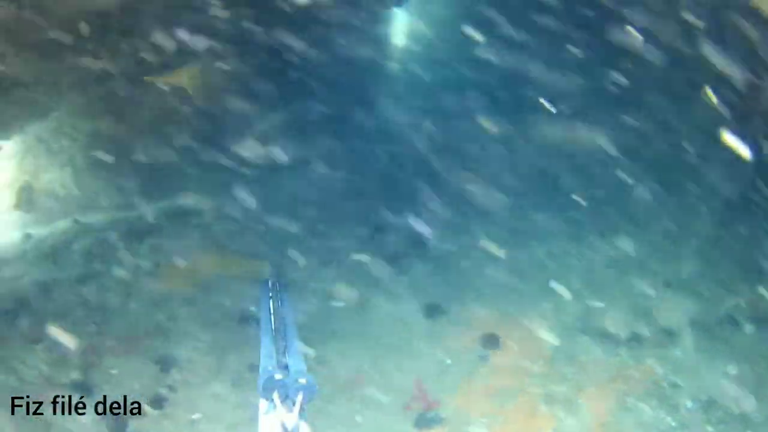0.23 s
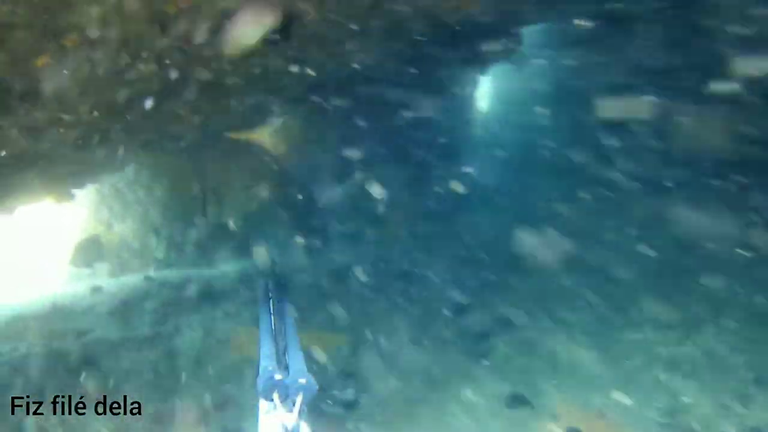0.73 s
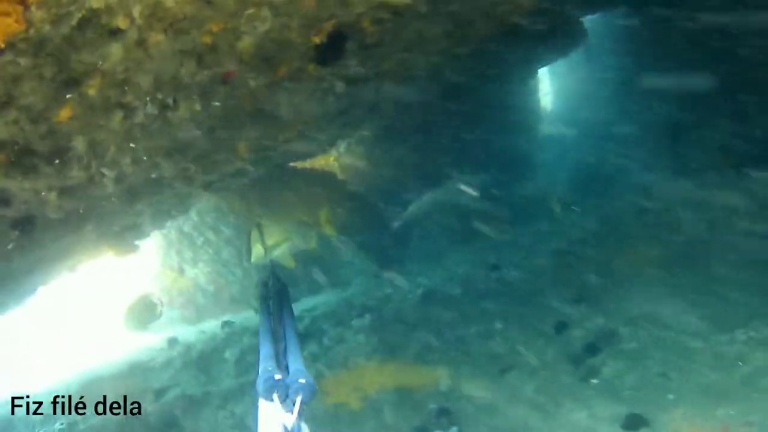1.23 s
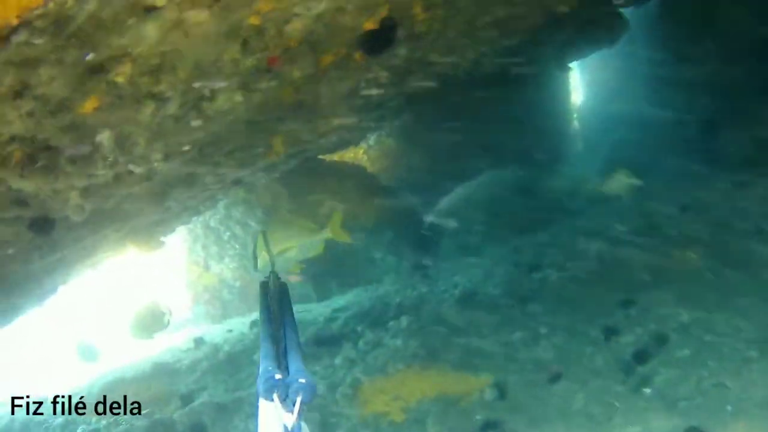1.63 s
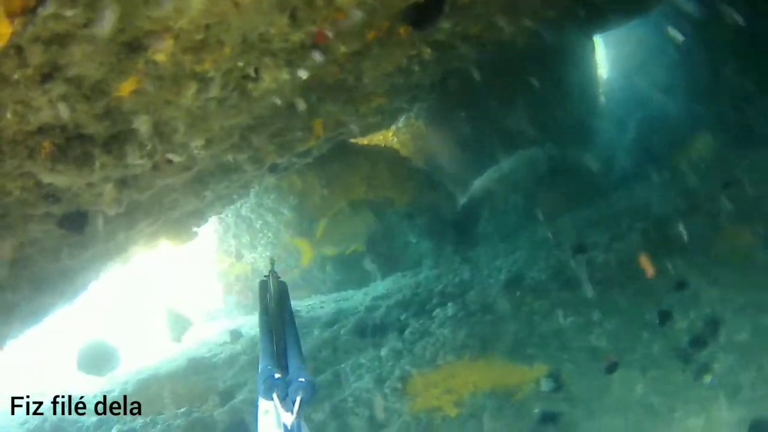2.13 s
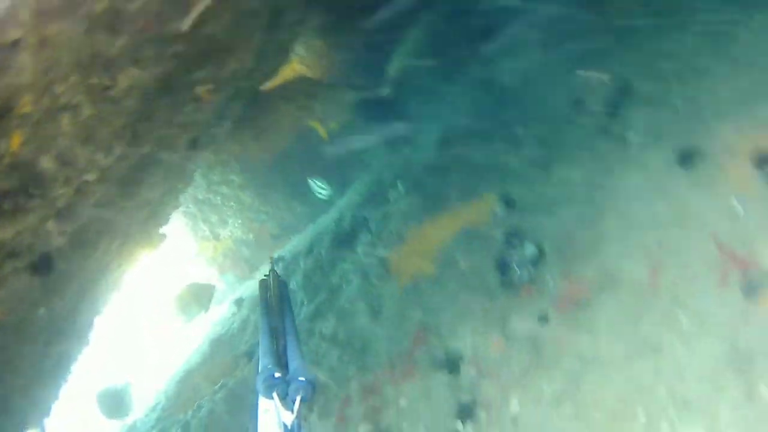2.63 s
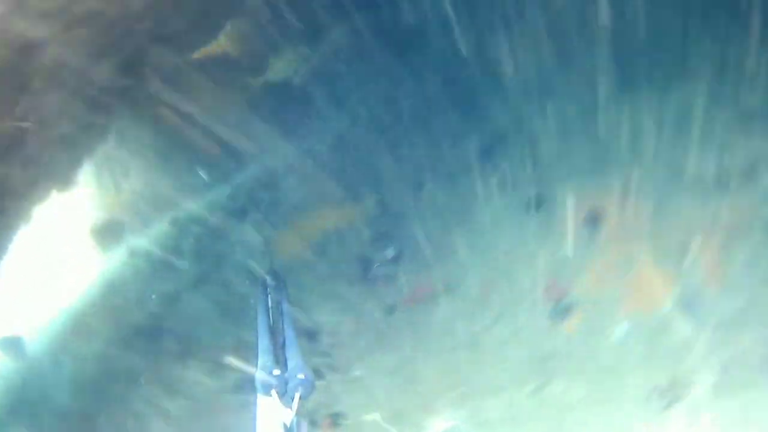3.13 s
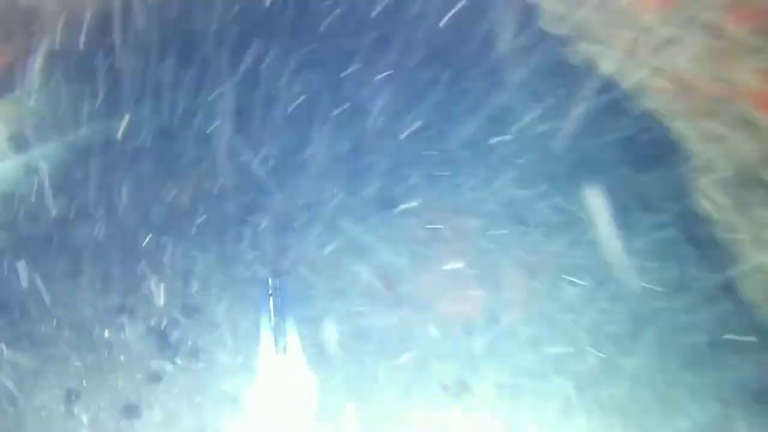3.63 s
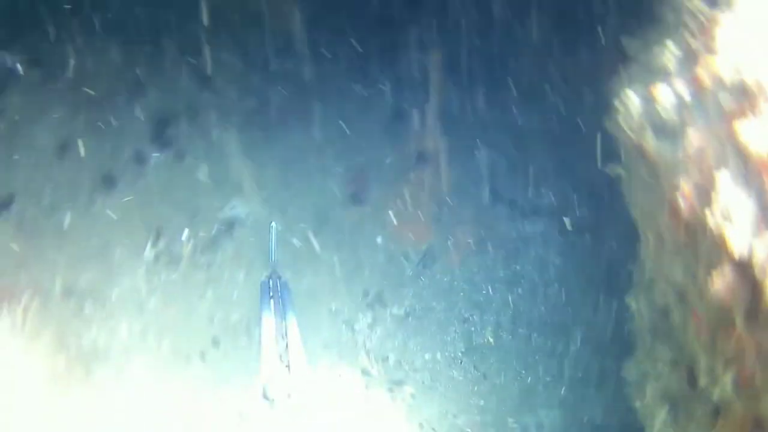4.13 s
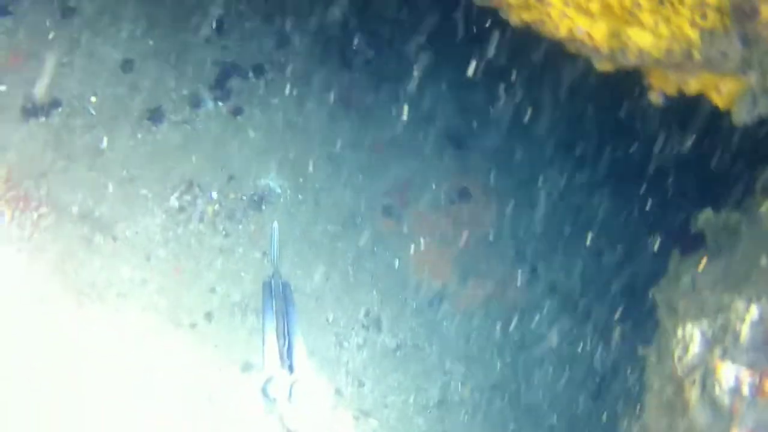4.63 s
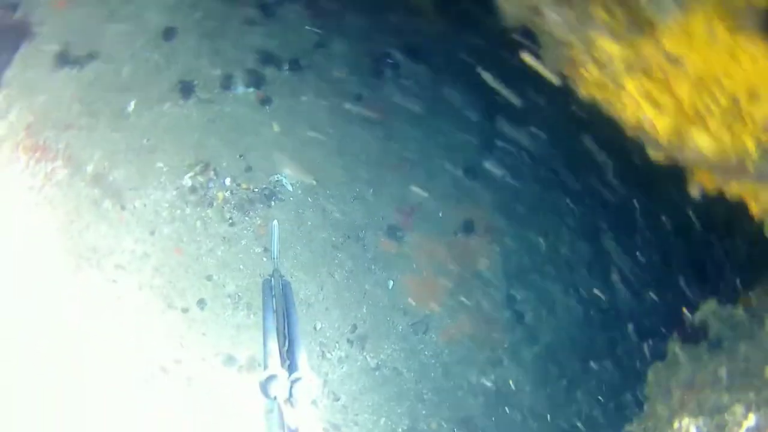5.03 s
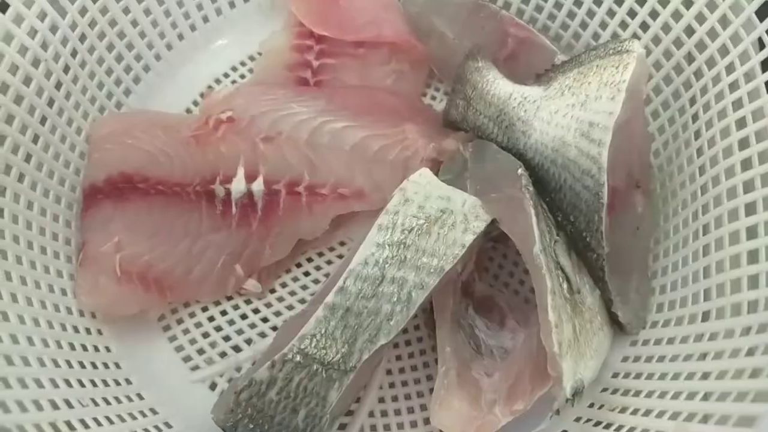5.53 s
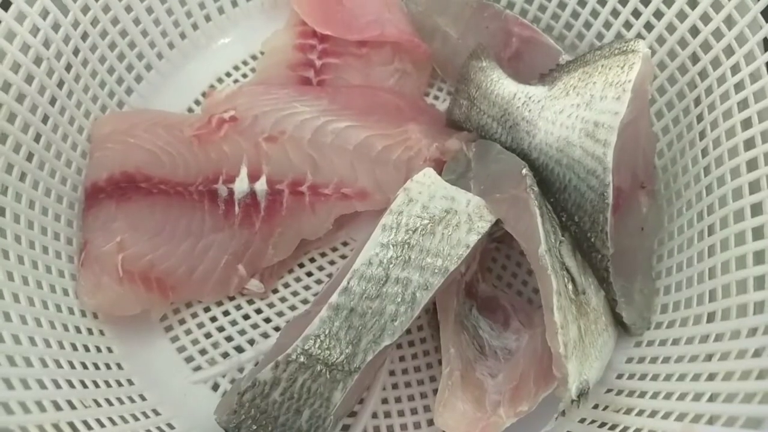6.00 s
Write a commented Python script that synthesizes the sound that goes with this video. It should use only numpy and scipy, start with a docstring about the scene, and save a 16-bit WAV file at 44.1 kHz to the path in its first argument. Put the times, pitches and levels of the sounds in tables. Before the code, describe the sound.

The sound starts underwater in a rock cave, muffled and in mono, with the microphone inside a sealed housing. For the first three seconds it is fairly quiet: small sharp snaps tick irregularly over a faint, distant reef crackle and soft water movement. At about 2.9 seconds a louder snap brings a fizz of fine bubbles, and water washes past with a low surge. Close bubbles plop from 3 to 3.8 seconds. Between 4.1 and 4.4 seconds gear knocks and scrapes hard, with a dull boom that briefly overloads the microphone; this is the loudest moment. Another knock comes near 5 seconds among more clicks, swishes and a few bubbles. At about 5.5 seconds the dive cuts off abruptly. A kitchen fades in, in stereo, with a quiet, steady fan-like hiss and a low appliance hum that last to the end, a little past 6 seconds.

```python
"""Rock cave dive, then a kitchen

Underwater in a cave, microphone inside a spearfisher's watertight camera housing. Sharp snaps tick on
the shell, bubbles plop close by, the reef crackles far off and water washes past with each movement.
Gear knocks and scrapes hard enough to overload the microphone. After a hard cut a kitchen fades in,
in stereo: an appliance hums under a steady hiss."""
import sys
import numpy as np
from scipy import signal
from scipy.fft import rfft, irfft, next_fast_len
from scipy.io import wavfile
from scipy.ndimage import map_coordinates

SR = 44100
rng = np.random.default_rng(int(sys.argv[2]) if len(sys.argv) > 2 else 0)


def unload_audio(sound):
    """Save the sound as a 16-bit wav file, at the path given as the first command line argument."""
    columns = np.transpose(np.atleast_2d(sound))
    # keep every value between -1 and 1, then stretch to whole-number steps
    steps = np.round(np.clip(columns, -1, 1) * 32767)
    wavfile.write(sys.argv[1], SR, steps.astype(np.int16))


N = 276177

# movements of the camera through the water: fastest t/s, level/dB, 20 dB rise/s, 20 dB fall/s
STROKES = [(0.0, -68, 0.3, 0.22), (1.15, -74, 0.39, 0.37), (1.6, -75.5, 0.36, 0.19), (2.45, -78, 0.51, 2),
           (3.15, -46, 0.1505, 0.2662), (3.69, -56, 0.298, 0.39), (4.26, -39.5, 0.1561, 0.16),
           (4.94, -43.5, 0.3678, 0.275), (5.37, -49.5, 0.31, 0.16)]
# spectra of slow pressure, calm water, moving water and the distant reef: f/Hz, density/dB
SURGE_SPECTRUM = [(6, -26.5), (14, 4), (33, -2), (45, -14.5), (60, -16), (100, -33.5), (250, -64.5)]
CALM_SPECTRUM = [(60, -2.5), (140, -0.5), (230, -2), (400, -6), (550, -9), (720, -1.5), (850, -11),
                 (1100, -15), (1500, -32), (3000, -60.5)]
FLOW_SPECTRUM = [(50, -29.5), (100, -7.5), (200, -4.5), (390, 0), (550, -9), (710, -5), (1020, -24),
                 (1800, -24), (2700, -29.5), (4500, -72.5)]
REEF_SPECTRUM = [(400, -33.5), (730, 7), (1100, -37), (1400, -17.5), (1650, 4.5), (2100, -7.5),
                 (2850, -9.5), (3400, -8), (4000, -17), (4600, -35)]
# flurries in the distant crackle: thickest t/s, level/dB
FLURRIES = [(0.01, -59.5), (0.28, -68), (0.5, -69), (1.1, -62), (1.67, -61.5), (1.95, -65), (3.37, -61.5),
            (4.53, -59), (4.679, -61.5), (5.16, -66), (5.359, -59.5)]
# nearest snaps, probably shrimp and loose gear: t/s, level/dB, low ring/dB, high ring/dB, centre f/Hz
SNAPS = [(0.0765, -36, -3, -15.5, 1590), (0.3442, -48, -7.5, -4.5, 1560), (0.4051, -47.5, 2, -1.5, 1660),
         (0.4577, -45.5, -28, -6, 2410), (0.4908, -46.5, 0, -7, 1610), (1.0428, -41.5, -23, -10.5, 1640),
         (1.056, -43, -3.5, -4, 1670), (1.459, -42.5, -4, -9, 1600), (1.49, -32, 1.5, -20, 1720),
         (1.5353, -37.5, -5, -14.5, 1667), (1.6258, -46.5, -13.5, -4, 1700),
         (1.7773, -40.5, -19.5, -8, 1660), (1.8813, -38.5, -3.5, -2.5, 2080), (1.9288, -47, -2.5, -8, 1570),
         (2.2578, -32.5, 1.5, -10, 2100), (2.3232, -41, -18, -5.5, 2170), (2.383, -44, -5, -10, 2050),
         (2.4413, -40.5, -4.5, -3.5, 1660), (2.4653, -39.5, -3, -6.5, 1520),
         (2.6531, -36.5, -4.5, -8, 1640), (2.9018, -17, -2, -28.5, 2090), (2.9262, -36.5, 1.5, -3.5, 2070),
         (2.9701, -30, -28, -13, 1633), (3.037, -22.5, -33.5, -22, 1670), (3.1539, -28, -17, -13.5, 1810),
         (3.1948, -37.5, 3, 0.5, 1620), (3.3223, -40, -28.5, -7.5, 1590), (3.467, -44, -18.5, -3.5, 1680),
         (3.5878, -32, -14.5, -12.5, 1655), (3.6973, -35.5, 3, -13.5, 2083),
         (3.7309, -35.5, 3.5, -32, 1860), (3.965, -27, -8.5, -15, 1713), (4.0142, -39.5, -2, -7, 2112),
         (4.0959, -24, 9.5, -15, 1767), (4.2102, -33.5, 0.5, -30, 1654), (4.257, -22.5, 3.5, -30, 1890),
         (4.3131, -19.5, 15, -16, 1750), (4.5349, -25.5, -9.5, -7, 1610), (4.5575, -36.5, 4, -13, 1520),
         (4.6473, -39, 0, -1, 1660), (4.718, -39.5, 4.5, -10, 1610), (4.757, -33.5, -22.5, -19.5, 1630),
         (4.802, -33.5, 6.5, -11.5, 1660), (4.8532, -26.5, -5, -7.5, 1990), (4.9505, -34, 7.5, -39.5, 1600),
         (5.017, -38, 5.5, -11.5, 1550), (5.2505, -41, 7, -18, 2120), (5.4278, -34.5, -19, 0.5, 1610)]
# modes of the housing's shell and of the camera on its mount: f/Hz, level/dB, t60/s
SHELL_MODES = [(716.3, -8.5, 0.0253), (871, 2, 0.00609), (1632.3, 6.5, 0.01973), (1919, -7, 0.024),
               (2068.5, 10, 0.0099), (2474.2, -3, 0.0294), (3273.2, -3.5, 0.01884), (3598, -2, 0.0068)]
MOUNT_MODES = [(177, -4, 0.076), (197.7, 4, 0.1054), (328.8, -4, 0.062), (441.7, 0, 0.034),
               (547, 1, 0.0285), (619.3, -2.5, 0.03), (669.3, 0, 0.047), (861, -1.5, 0.021),
               (1030, -7, 0.02)]
# bubbles close by: t/s, level/dB, starting f/Hz, t60/s
BUBBLES = [(0.63, -64.5, 581, 0.033), (1.2, -55, 693, 0.044), (3.036, -23, 1683, 0.0213),
           (3.087, -27, 723.6, 0.0274), (3.366, -38.5, 507.4, 0.054), (3.513, -38, 488.3, 0.0656),
           (3.641, -29.5, 683, 0.0298), (3.645, -31, 304.4, 0.0445), (3.654, -37, 449, 0.0198),
           (3.742, -27, 662, 0.0655), (3.74, -22, 294.5, 0.0213), (3.757, -20, 364.3, 0.0476),
           (3.769, -20, 293.6, 0.0486), (4.385, -29, 323.5, 0.05), (4.69, -39.5, 694, 0.035),
           (5.272, -37.5, 415, 0.025), (5.327, -31.5, 379.5, 0.0254)]
# puffs of fine bubbles: densest t/s, level/dB, 20 dB rise/s, 20 dB fall/s
PUFFS = [(2.93, -43, 0.0871, 0.1029), (3.055, -47.5, 0.03, 0.1629), (3.64, -47, 0.1842, 0.2347),
         (4.96, -47.5, 0.0083, 0.1162)]
# knocks of the gear, soft contacts low in pitch: t/s, level/dB, centre f/Hz
KNOCKS = [(3.1273, -26.5, 644), (3.154, -30, 420), (3.198, -44, 500), (4.0995, -11.5, 402.7),
          (4.104, -14, 667), (4.163, -22, 415), (4.222, -25.5, 411), (4.259, -11.5, 614.2),
          (4.265, -5, 261), (4.281, -10.5, 447), (4.317, -12, 231), (4.334, -8, 553), (4.799, -24.5, 300),
          (4.9496, -19, 826), (4.951, -17.5, 445)]
# the housing swinging or booming after hard jolts: t/s, level/dB, f/Hz, t60/s
SWINGS = [(4.103, -12, 16.6, 0.312), (4.302, -5.5, 19, 0.633), (4.3168, 5, 183.3, 0.095),
          (5.316, -18.5, 17, 0.446)]
# gear dragging over rock: hardest t/s, level/dB, 20 dB rise/s, 20 dB fall/s
SCRAPES = [(4.11, -40, 0.1012, 0.08), (4.166, -40.5, 0.0342, 0.07), (4.265, -20, 0.0124, 0.0514),
           (4.315, -14, 0.0449, 0.0419)]
# tones of the appliance: f/Hz, level/dB
HUM_TONES = [(59.2, -62.5), (118.4, -47.5), (198, -67), (360.7, -67), (1184, -68), (1367, -68)]
# spectra of the kitchen's hiss and rumble: f/Hz, density/dB
HISS_SPECTRUM = [(82, -32.5), (140, -3.5), (229, -5), (273, -20.5), (353, -8.5), (390, -8.5), (874, -15),
                 (965, -13), (1400, -16.5), (2390, -23.5), (3270, -21.5), (4060, -23.5), (4660, -34),
                 (5680, -32), (15500, -39)]
RUMBLE_SPECTRUM = [(15, -6), (28, 1), (55, -6.5), (90, 13), (140, -8.5), (200, -11), (400, -40)]
# likeness of left and right in the kitchen: f/Hz, correlation
STEREO_LIKENESS = [(60, -0.3), (150, -0.454), (380, 0.416), (950, 1), (2380, -0.59), (5980, 0.11),
                   (15000, -0.022)]
# a brief high sizzle: loudest t/s, level/dB, 20 dB rise/s, 20 dB fall/s
SIZZLE = [(6.182, -58, 0.17, 0.05)]

CALM_DB = -76.5  # floor of the wash's envelope, the diver holding still
CUT_S, FADE_START_S, FADE_S = 5.46, 5.4955, 0.2434  # the dive ends; the kitchen fades in


def amp(db):
    """Decibels to gain."""
    return 10 ** (np.asarray(db) / 20)


def unit(x):
    """Scale to rms 1."""
    return x / np.sqrt(np.mean(x ** 2) + 1e-20)


def crest(x):
    """Scale to peak 1."""
    return x / (np.abs(x).max() + 1e-20)


def blow(x, span_s):
    """Scale a ring to the energy of a unit sine that lasts span_s."""
    return x * np.sqrt(span_s * SR / 2) / (np.linalg.norm(x) + 1e-20)


def along(points, hz):
    """Interpolate (f/Hz, value) points on a log axis."""
    f, v = np.transpose(points)
    return np.interp(np.log(hz + 1), np.log(f + 1), v)


def wobble(rate):
    """A smooth random curve, rate knots a second."""
    return map_coordinates(rng.standard_normal(int(N * rate / SR) + 4), [np.arange(N) * rate / SR])


def filtered(x, response):
    """Filter x by a response of frequency."""
    m = next_fast_len(N + SR // 2)
    return irfft(rfft(x, m) * response(np.fft.rfftfreq(m, 1 / SR)), m)[..., :N]


def coloured(x, spectrum):
    """x shaped by a spectrum, at rms 1."""
    return unit(filtered(x, lambda hz: amp(along(spectrum, hz))))


def noise(spectrum):
    """Coloured noise of rms 1."""
    return coloured(rng.standard_normal(N), spectrum)


def grains(rate, spread_db):
    """Random impulses of uneven size, at rms 1."""
    impulses = (rng.random(N) < rate / SR) * rng.choice([-1, 1], N)
    return unit(impulses * amp(spread_db * np.clip(rng.standard_normal(N), -2, 2)))


def swells(rows, roundness=1.282):
    """Gain of sounds that each grow to a rounded peak and die away; overlaps add in power."""
    t = np.arange(N) / SR
    gains = [amp(db - 20 * np.maximum((s - t) / rise_s, (t - s) / fall_s) ** roundness)
             for s, db, rise_s, fall_s in rows]
    return np.linalg.norm(gains, axis=0)


def ring(modes, t, rise_s):
    """Damped sines that build up over rise_s, each in its own phase."""
    tones = sum(amp(db - 60 * t / t60) * np.sin(2 * np.pi * (hz * t + rng.random()))
                for hz, db, t60 in modes)
    return tones * (1 - np.exp(-(t / rise_s) ** 2))


def favour(modes, centre_hz, slope_db):
    """Modes lose slope_db for each octave between them and the centre of the blow."""
    return [(hz, db - slope_db * abs(np.log2(hz / centre_hz)), t60) for hz, db, t60 in modes]


def scattered(x, t, echo, spread_s):
    """The direct sound and a quick cloud of echoes from nearby surfaces."""
    path = rng.standard_normal(len(t)) * t * np.exp(-t / spread_s)
    path *= echo / np.linalg.norm(path)
    path[0] = 1
    return signal.fftconvolve(x, path)[:len(t)]


def add(track, s, sound):
    """Mix a sound in at s seconds."""
    part = track[round(s * SR):][:len(sound)]
    part += sound[:len(part)]


def surge(effort_db, rest_db=-57, growth=0.39):
    """Slow pressure on the housing grows with the diver's effort."""
    return amp(rest_db + growth * effort_db) * noise(SURGE_SPECTRUM)


def wash(effort_db, gain_db=2, flutter_db=3.2):
    """Water right at the housing: faster flow is louder and shifts from the shell's ring to a churn."""
    flow_db = CALM_DB + effort_db
    moving = np.clip((flow_db + 62.5) / 12, 0, 1)
    churn = np.sqrt(moving) * noise(FLOW_SPECTRUM) + np.sqrt(1 - moving) * noise(CALM_SPECTRUM)
    return amp(flow_db + gain_db + flutter_db * wobble(35)) * churn


def reef(effort_db, rest_db=-75.5, growth=0.22, rise_s=0.1, fall_s=0.1318):
    """Distant snaps crackle in flurries, each striking the shell's modes with new strengths."""
    t = np.arange(SR // 12) / SR
    far_snaps = grains(rate=70, spread_db=3)
    ticks = np.zeros(N)
    for mode in favour(SHELL_MODES, 2800, slope_db=2.5):
        strikes = far_snaps * rng.standard_normal(N)
        ticks += signal.fftconvolve(strikes, ring([mode], t, rise_s=0.0014))[:N]
    bed = amp(6.04 * wobble(52)) * coloured(grains(rate=1500, spread_db=-4), REEF_SPECTRUM)
    flurries = swells([(s, db, rise_s, fall_s) for s, db in FLURRIES])
    return np.hypot(amp(rest_db + growth * effort_db), flurries) * (bed + unit(ticks))


def snaps(trim_db=-2):
    """Each close snap rings the low, middle and high modes of the shell in its own proportions."""
    out, t = np.zeros(N), np.arange(SR // 12) / SR
    for s, db, low_db, high_db, hz in SNAPS:
        low = ring(SHELL_MODES[:2], t, rise_s=0.00213)
        crack = [(hz, 5, 0.005)]  # the snap's own short, broad pulse
        middle = ring(favour(SHELL_MODES[2:6], hz, slope_db=10) + crack, t, rise_s=0.00043)
        high = ring(SHELL_MODES[6:], t, rise_s=0.00022)
        for tone, band_db in [(low, low_db + trim_db), (middle, 0), (high, high_db + trim_db)]:
            tick = scattered(tone, t, echo=0.982, spread_s=0.00159)
            add(out, s, amp(db + band_db) * blow(tick, span_s=0.00151))
    return out


def cave(x, wet_db=-13, tail_s=0.00906, echoes_per_s=1500):
    """Rock walls close to the microphone answer with a short, grainy patter of reflections."""
    out, t = np.zeros(N), np.arange(SR // 8) / SR
    for start in range(0, N, len(t)):  # the diver moves, so the paths keep changing
        arrivals = rng.random(len(t)) < echoes_per_s / SR
        paths = arrivals * rng.standard_normal(len(t)) * t * np.exp(-t / tail_s)
        add(out, start / SR, signal.fftconvolve(x[start:start + len(t)], paths / np.linalg.norm(paths)))
    return x + amp(wet_db) * out


def bubbles(swell=0.0564, sag=0.181, sag_s=0.023, shell_db=-17):
    """A nearby bubble swells, rings while its pitch sags, and faintly stirs the shell."""
    out, t = np.zeros(N), np.arange(SR // 6) / SR
    for s, db, hz, t60 in BUBBLES:
        pitch = hz * (1 - sag * (1 - np.exp(-t / sag_s)))
        envelope = amp(-60 * t / t60) * (1 - np.exp(-(t / (swell * t60)) ** 2))
        tone = envelope * np.sin(2 * np.pi * np.cumsum(pitch) / SR)
        plop = crest(scattered(tone, t, echo=0.895, spread_s=0.00466))
        shell = crest(ring(favour(SHELL_MODES, hz, slope_db=25.5), t, rise_s=0.0016))
        add(out, s, amp(db) * (plop + amp(shell_db) * shell))
    return out


def fizz(gain_db=-1):
    """Fine bubbles come in puffs after loud snaps and plops."""
    spectrum = [(200, -6), (700, 1), (1200, -7.5), (2100, -4), (2800, -22), (4000, -33)]
    return amp(gain_db) * swells(PUFFS) * coloured(grains(rate=2800, spread_db=5.5), spectrum)


def knocks():
    """Gear strikes and rings the camera's mount; hard jolts set the housing swinging or booming."""
    out, t = np.zeros(N), np.arange(SR // 4) / SR
    for s, db, hz in KNOCKS:
        contact = [(hz, 10, 0.009)]  # a few cycles only
        tone = ring(favour(MOUNT_MODES, hz, slope_db=8.5) + contact, t, rise_s=0.5 / hz)
        knock = scattered(tone, t, echo=0.713, spread_s=0.002725)
        add(out, s, amp(db) * blow(knock, span_s=0.00382))
    t = np.arange(SR) / SR
    for s, db, hz, t60 in SWINGS:
        add(out, s, ring([(hz, db, t60)], t, rise_s=0.319 / hz))
    return out


def scrapes(gain_db=-1, shell_db=-11):
    """Rough rock plucks the mount and the shell many times a second."""
    t = np.arange(SR // 6) / SR
    mount = unit(ring(favour(MOUNT_MODES, 710, slope_db=4.5), t, rise_s=0.0023))
    shell = unit(ring(favour(SHELL_MODES[2:5], 1737, slope_db=29.5), t, rise_s=0.00018))
    plucks = grains(rate=900, spread_db=6.5)
    rasp = unit(signal.fftconvolve(plucks, mount + amp(shell_db) * shell)[:N])
    return amp(gain_db) * swells(SCRAPES) * rasp


def housed_microphone(x, ceiling=0.66, edge_hz=4100):
    """The microphone overloads at the hardest blow; the sealed shell passes no treble."""
    clipped = x / (1 + np.abs(x / ceiling) ** 6) ** (1 / 6)
    return filtered(clipped, lambda hz: 1 / np.sqrt(1 + (hz / edge_hz) ** 44))


def appliance(t, pan_db=2.5):
    """A hum left of centre, strongest at twice the mains rate."""
    hum = sum(amp(db) * np.sqrt(2) * np.sin(2 * np.pi * hz * t + 0.1 * wobble(5.5))
              for hz, db in HUM_TONES)
    return hum * amp([[pan_db], [-pan_db]])


def room_noise(spectrum, bounce_s=0.000427, bounce=0.34):
    """Stereo noise, its sides partly alike; a surface close to the microphone combs the treble."""
    def mid_side(hz):
        angle = np.arccos(np.clip(along(STEREO_LIKENESS, hz), -1, 1)) / 2
        comb = 1 - bounce * np.clip(hz / 4500, 0, 1) ** 2 * np.exp(-2j * np.pi * hz * bounce_s)
        return comb * np.array([np.cos(angle), np.sin(angle)])
    mid, side = filtered(np.array([noise(spectrum), noise(spectrum)]), mid_side)
    return unit(np.array([mid + side, mid - side]))


def kitchen_air(hiss_db=-48, rumble_db=-56, pan_db=-0.22):
    """Fan-like hiss and low rumble all round the microphone, with one brief high sizzle."""
    hiss = amp(hiss_db) * room_noise(HISS_SPECTRUM)
    sizzle_spectrum = [(4000, -26), (7000, -10.5), (9500, 3), (12000, -10.5), (15500, -2)]
    sizzle = swells(SIZZLE) * room_noise(sizzle_spectrum)
    rumble = amp(rumble_db) * room_noise(RUMBLE_SPECTRUM)
    return (hiss + sizzle) * amp([[pan_db], [-pan_db]]) + rumble


def scene():
    """The dive is mono and ends at a hard cut; the kitchen fades in, in stereo."""
    t = np.arange(N) / SR
    effort_db = 20 * np.log10(amp(CALM_DB) + swells(STROKES)) - CALM_DB  # 0 while holding still
    close = cave(snaps()) + bubbles() + knocks() + scrapes()
    water = surge(effort_db) + wash(effort_db) + reef(effort_db) + fizz()
    dive = housed_microphone(close + water)
    self_noise = amp(-95) * rng.standard_normal(N)
    kitchen = appliance(t) + kitchen_air()
    fade_in = np.clip((t - FADE_START_S) / FADE_S, 0, 1) ** 0.69
    return dive * (t < CUT_S) + kitchen * fade_in + self_noise


def record(dry, top_hz=15750):
    """Nothing is kept above the band limit."""
    return filtered(dry, lambda hz: hz < top_hz)


dry = scene()
out = record(dry)
unload_audio(out)
```